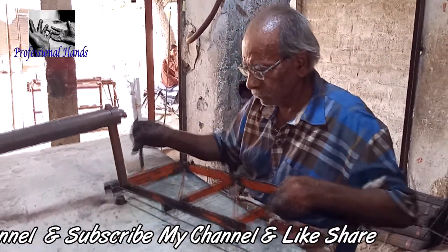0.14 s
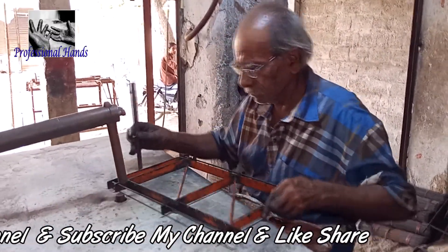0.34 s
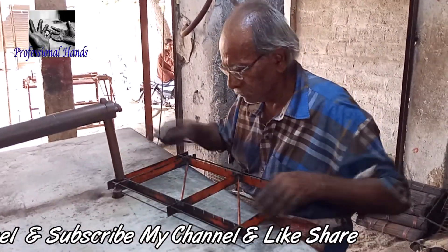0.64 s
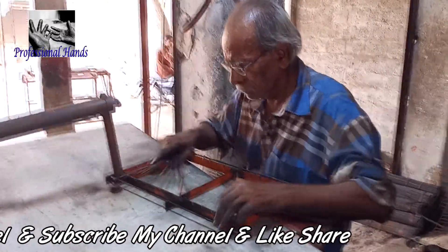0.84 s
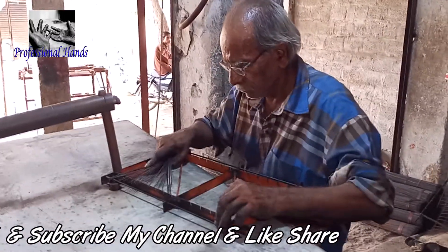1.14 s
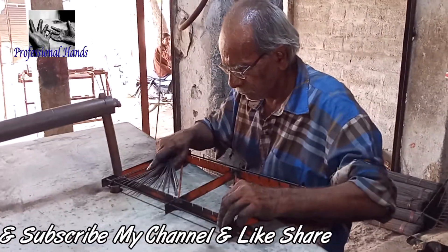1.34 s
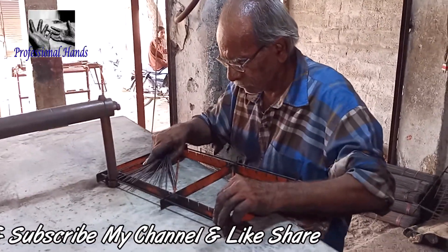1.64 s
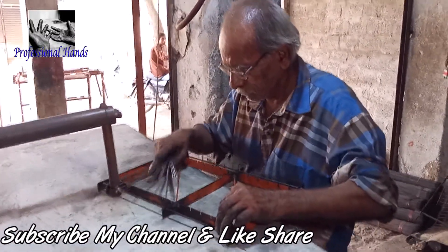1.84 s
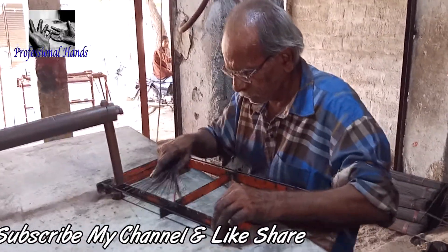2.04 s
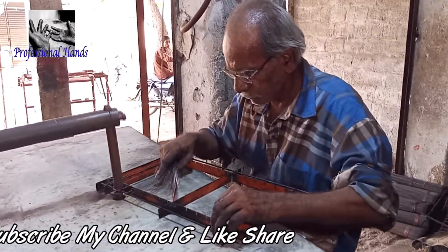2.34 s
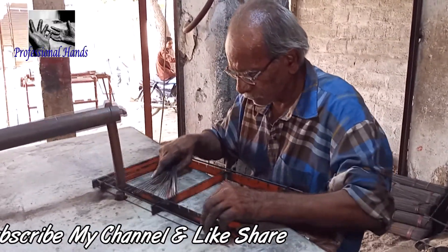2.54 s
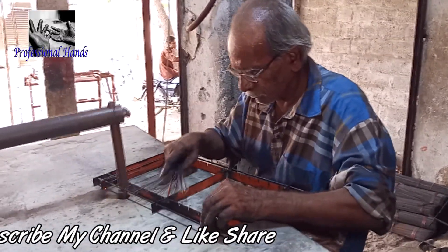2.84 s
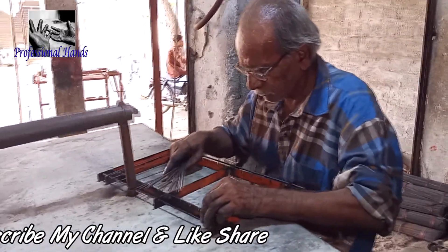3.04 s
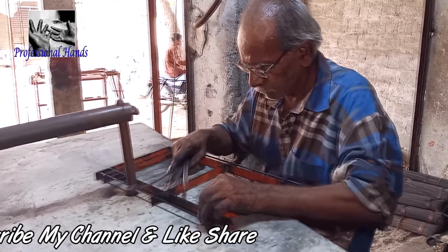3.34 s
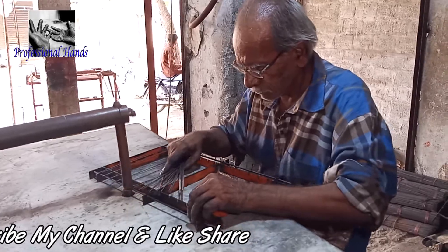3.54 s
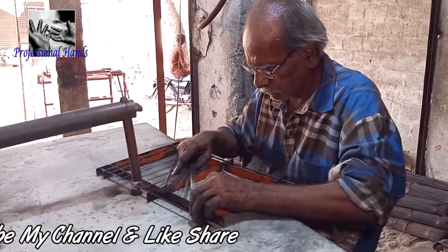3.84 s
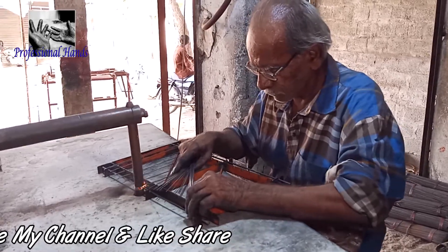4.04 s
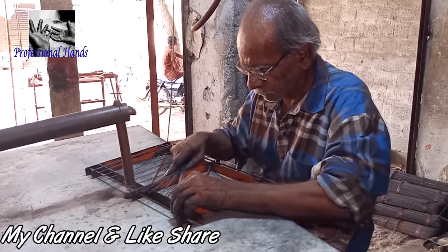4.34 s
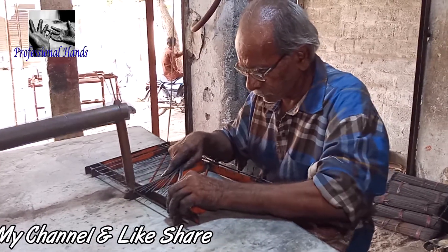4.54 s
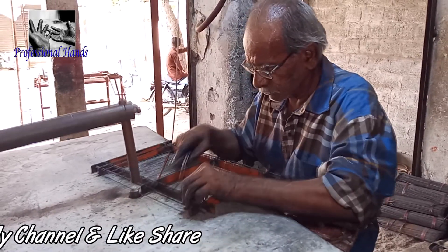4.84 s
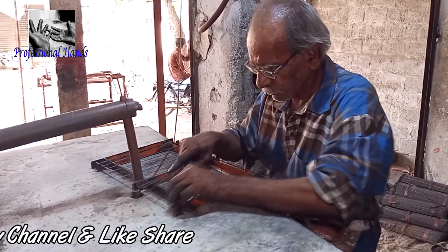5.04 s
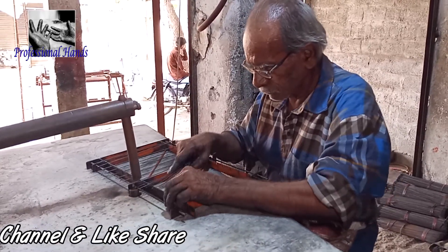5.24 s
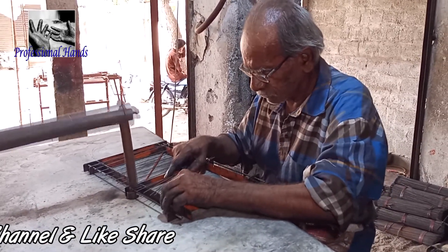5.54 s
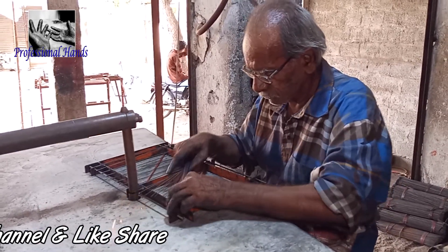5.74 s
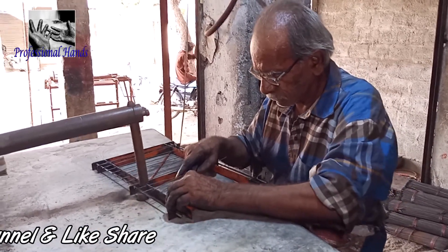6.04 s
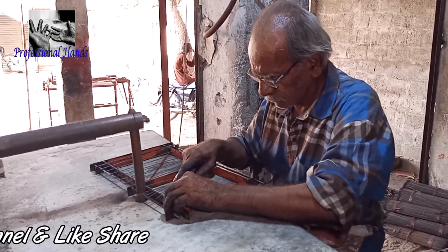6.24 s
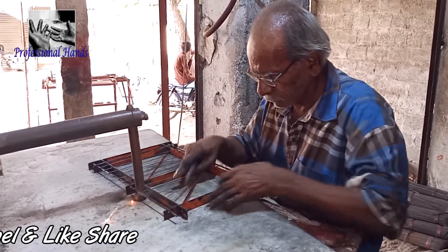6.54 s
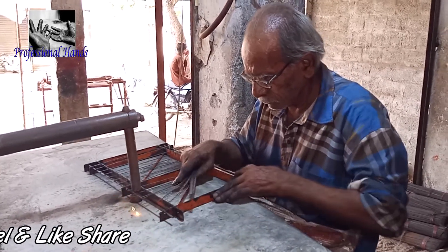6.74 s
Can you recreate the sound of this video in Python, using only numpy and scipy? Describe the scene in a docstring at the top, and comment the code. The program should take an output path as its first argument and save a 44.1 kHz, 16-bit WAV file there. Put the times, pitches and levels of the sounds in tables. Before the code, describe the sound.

A wire bundle taps a workshop bench, a steel frame scrapes, then a pedal spot welder clacks down and springs back about every half second.

```python
"""Over a faint street wash, a bundle of wires is tapped on a workshop bench, jolting a steel frame.
Thin squeaks and rustles follow; the frame is shoved along with a rasp, and loose wires tick.
Then a pedal spot welder joins wires: its arm clacks down, rattles, and springs back about a fifth of
a second later. The frame is shoved again as the first weld lands, between welds and after the last,
and once set down with a knock. Blows and shoves mix fading noise with sine tones; squeaks are sines."""
import sys
import numpy as np
from scipy import signal
from scipy.fft import rfft, irfft, next_fast_len
from scipy.io import wavfile
from scipy.ndimage import uniform_filter1d, minimum_filter1d, map_coordinates

SR = 44100
rng = np.random.default_rng(int(sys.argv[2]) if len(sys.argv) > 2 else 0)


def pcm_store(signal):
    """Save signal as 16-bit PCM."""
    levels = np.round(np.clip(np.atleast_2d(signal), -1, 1) * 32767)
    wavfile.write(sys.argv[1], SR, levels.astype(np.int16).T)


N = 304290  # length of the scene in samples
T = np.arange(SR) / SR  # the second that follows a blow, in s

# In all tables, t60_s is the time to fade by 60 dB; levels are relative to the other parts of a sound.
# wire bundle tapped on end: start_s, level_db, bright_db (per octave), snap_db, first_wire_db,
# jolt_db (of the frame)
TAPS = [(.014, -26.5, -0.3, -3.5, -36.5, -45), (0.24, -34.5, 3.5, 8, -36.5, -71),
        (.380, -33, -0.5, 9.5, -36, -45.5)]
# ringing pitches of the wire bundle: pitch_hz, level_db, t60_s
BUNDLE_MODES = [(785, -12.5, 0.33), (895, -12, 0.29), (1209, -4.5, 0.3), (1282, -9, 0.34),
                (1435, -10, 0.27), (1905, -16, 0.46), (2020, -4.5, 0.21), (2420, -9, 0.3),
                (2570, -12, 0.33), (2860, -11.5, 0.25), (2982, -7.5, .3), (3240, -10.5, 0.19),
                (3240, -12, 0.32), (3920, -15.5, 0.21), (4500, -23.5, 0.22)]
# fading of the taps, knocks and ticks: pitch_hz, t60_s
TAP_FADE = [(200, 0.43), (1200, 0.24), (3000, 0.22), (8000, 0.11)]
# one pedal stroke a row: down_s, up_s, press_db, release_db, click_db (of the electrode),
# extra_bright_db (per octave), ring_db, sway_db (of the arm)
WELDS = [(1.690, 1.89, -15.5, -22.5, -34, -1, -1, -30.5), (2.184, 2.385, -14, -21, -12, .1, -0.5, -29.5),
         (2.661, 2.845, -14.5, -21, -26, -0.37, -1, -27.5), (3.124, 3.31, -17, -22.5, -25, 0, 1, -26),
         (3.615, 3.804, -15.5, -21.5, -7.5, -0.16, 1, -35), (4.082, 4.271, -18, -25, -7, 0.38, -0.5, -43.5),
         (4.66, 4.832, -16, -19, -12.5, 0.24, -0.5, -35.5),
         (5.646, 5.847, -15.5, -22, -10.5, 0.26, -1, -35), (6.318, 6.503, -14, -21, -5.5, 0, -1.5, -23)]
# ringing pitches of the welder arm: pitch_hz, level_db, t60_s
ARM_MODES = [(75.3, -26.5, 1.4), (148.2, -12.5, 0.47), (173.4, -14.5, 0.62), (201.6, -9.5, 0.38),
             (255.4, -11, 1.06), (315.5, -1.5, 0.29), (339.7, -2.5, 0.75), (375.2, -9.5, 0.48),
             (392, -3.5, 0.39), (455, -13, 0.33), (507, -12.5, 0.47), (542.5, -15.5, 0.32), (643, -12, 0.4),
             (670, -7, 0.39), (700, -15, 0.93), (817, -18, 1.3), (896, -21, 1.1), (1254, -13, 0.36),
             (1890, -29.5, 0.4), (3110, -20, 0.29), (3200, -41.5, .9), (4460, -39, 1)]
# short ringing pitches of the electrode tip: pitch_hz, level_db, t60_s
ELECTRODE_MODES = [(1493, -4, 0.16), (1890, -7.5, 0.046), (2850, -2.5, .04), (3330, 0.5, 0.033),
                   (4220, -6.5, 0.055)]
# tone colour of a press: pitch_hz, level_db (per Hz)
PRESS_COLOUR = [(30, -62), (80, -16), (140, -2.5), (320, 8), (450, -2), (580, -1.5), (700, 0.5),
                (1050, -9.5), (2000, -11), (2600, -19.5), (3400, -21), (5600, -33.5), (8500, -52.5),
                (13000, -52), (15000, -40.5)]
# fading of the welder's dense ringing, steel and room together: pitch_hz, t60_s
STEEL_FADE = [(100, 1), (350, 0.78), (1000, 0.72), (2500, 0.47), (5000, 0.3), (14000, 0.31)]


def amp(db):
    """Turn decibels into a plain multiplier."""
    return 10 ** (np.asarray(db) / 20)


def unit(x):
    """Scale a signal to an average strength (rms) of 1."""
    return x / np.sqrt(np.mean(x ** 2) + 1e-20)


def along(points, hz):
    """Read a curve of (pitch, value) points, spaced by pitch ratio."""
    point_hz, value = np.transpose(points)
    return np.interp(np.log(hz + 1), np.log(point_hz + 1), value)


def add(track, s, sound):
    """Mix a sound in at time s, in seconds."""
    start = max(round(s * SR), 0)
    track[start:start + len(sound)] += sound[:max(N - start, 0)]


def wobble(rate):
    """A smooth random curve with rate random points a second."""
    coarse_t = T[::20]
    knots = map_coordinates(rng.standard_normal(1024), [coarse_t * rate], mode="wrap")
    return np.interp(T, coarse_t, knots)


def damped(stop):
    """A steep fade that ends the ringing at around stop seconds."""
    return 1 / (1 + (T / stop) ** 10)


def bell(width):
    """A smooth swell and fade that peaks after four widths (in seconds)."""
    return np.exp(-.5 * (T / width - 4) ** 2)


def tilt(hz, bright_db):
    """Harder contact lifts the treble against the bass, by bright_db an octave."""
    return amp(bright_db * np.log2(np.clip(hz, 200, 8000) / 800))


def noise(colour, size, bright_db=0, ripple_db=0, spacing=55):
    """Coloured noise of rms 1; ripple_db adds random resonances, spacing Hz apart."""
    hz = np.fft.rfftfreq(size, 1 / SR)
    knots = rng.standard_normal(2048)
    ripple = np.clip(map_coordinates(knots, [hz / spacing], mode="wrap", order=1), -2, 2)
    ripple = ripple * hz / (hz + 350)  # less ripple in the bass
    gain = amp(along(colour, hz) + ripple_db * ripple) * tilt(hz, bright_db)
    return unit(irfft(rfft(rng.standard_normal(size)) * gain, size))


def dense_ring(colour, fade, bright_db, hold, ripple_db=1.0, patchy_db=2.0, uneven=0.32):
    """Countless close pitches, fed in clumps for hold seconds, then dying unevenly so a few linger."""
    hz, t, z = signal.stft(noise(colour, SR, bright_db, ripple_db), SR, nperseg=512)
    loose = (hz / (hz + 500))[:, None]  # high pitches vary most
    luck = np.clip(rng.standard_normal((len(hz), 1)), -2, 2)
    life = along(fade, hz)[:, None] * np.exp(uneven * loose * luck)
    patches = uniform_filter1d(rng.standard_normal(z.shape), size=5, axis=0)
    patches = uniform_filter1d(patches, size=2, axis=1)
    clumps = unit(amp(patchy_db * loose * unit(patches)))
    dying = amp(-60 * np.maximum(t - hold, 0) / life)
    return signal.istft(z * clumps * dying, SR, nperseg=512)[1][:SR]


def clear_ring(modes, hold, scatter_db=2, detune=0.00392):
    """Strong single tones, at new strengths for each blow; loose joints unsettle the high ones most."""
    out = np.zeros(SR)
    for hz, db, t60 in modes:
        loose = np.sqrt(hz / 500)
        pitch = hz * (1 + detune * loose * rng.standard_normal())
        phase = 2 * np.pi * (pitch * T + rng.random()) + 0.23 * (1 + loose) * wobble(30.6)
        build = 1 - np.exp(-T * hz / 4)  # low modes need longer to swing up
        fading_db = -60 * np.maximum(T - hold, 0) / t60
        out += amp(db + scatter_db * rng.standard_normal() + fading_db) * build * np.sin(phase)
    return out


def click(modes, colour, bright_db, detune=0.012, crack_db=-3, crack_t60=0.0034):
    """The first instant of contact: a few short tones and a crack of noise."""
    ring = np.zeros(SR)
    for hz, db, t60 in modes:
        pitch = hz * (1 + detune * rng.standard_normal())
        # each tone starts at a random phase, anywhere in the cycle
        ring += amp(db - 60 * T / t60) * np.sin(2 * np.pi * (pitch * T + rng.random()))
    crack = amp(crack_db - 60 * T / crack_t60) * noise(colour, SR, bright_db + 4.0)
    contact = np.sin(np.pi / 2 * np.minimum(T / .0008, 1)) ** 2  # fade in over 0.8 ms
    return contact * (ring + crack)


def blows(events, contact, modes, colour, fade, hold, lead, rise, stop, dense_db, ring_db, click_db,
          rattle_db, ripple_db=3.0, scatter_db=2.5, **touch):
    """Parts touch lead seconds before each click, then chatter and feed the dense and clear ringing."""
    track = np.zeros(N)
    swell = (1 - np.exp(-T / rise)) ** 2 * damped(stop)
    for s, db, bright_db, own_ring_db, own_click_db in events:
        rattle = amp(dense_db + rattle_db * wobble(179.8))
        dense = rattle * dense_ring(colour, fade, bright_db, hold, ripple_db)
        clear = amp(ring_db + own_ring_db) * clear_ring(modes, hold, scatter_db)
        add(track, s - lead, amp(db) * swell * (dense + clear))
        first_touch = click(contact, colour, bright_db, **touch)
        add(track, s, amp(db + click_db + own_click_db) * first_touch)
    return track


def street():
    """A faint, slowly swaying wash of noise through the open door."""
    # tone colour: pitch_hz, level_db (per Hz)
    street_colour = [(25, -29), (50, -17.5), (100, 1.5), (200, -1.5), (400, -2.5), (800, -6.5),
                     (1600, -10.5), (2500, -15.5), (4000, -27.5), (6300, -34), (8000, -47), (15000, -50)]
    level_db = -56.5
    sway_db = .6 * map_coordinates(rng.standard_normal(64), [np.arange(N) / SR * 5], mode="wrap")
    return amp(level_db + sway_db) * noise(street_colour, N)


def taps():
    """Wire ends strike the bench almost together, longest first: a snap, then ringing of varied balance."""
    # short ringing pitches of the wire ends on the bench: pitch_hz, level_db, t60_s
    end_modes = [(1207, 1, 0.094), (1680, 2, 0.05), (2230, 2, 0.04), (2380, 2, 0.059), (2904, 2, 0.05),
                 (3260, -3.5, 0.042), (3600, -0.5, 0.03), (4380, -10.5, 0.041), (4840, -20, 0.033)]
    # tone colour: pitch_hz, level_db (per Hz)
    tap_colour = [(60, -23), (250, -4), (550, -22), (850, 2), (1200, 0.5), (2400, 10), (3400, 2),
                  (4700, -7), (6000, -31.5), (8000, -59), (15000, -58)]
    first_wire_lead_s, ring_db = .0048, 0.5
    events = []
    for s, db, bright_db, snap_db, first_wire_db, _ in TAPS:
        events.append((s - first_wire_lead_s, first_wire_db, bright_db, ring_db, snap_db))
        events.append((s, db, bright_db, ring_db, snap_db))
    return blows(events, end_modes, BUNDLE_MODES, tap_colour, TAP_FADE, hold=.012, lead=0, rise=0.0018,
                 stop=.35, dense_db=-0.5, ring_db=-2, click_db=-3.0, rattle_db=1, ripple_db=5,
                 scatter_db=2.5, detune=0.012, crack_db=1, crack_t60=.034)


def knocks():
    """Each tap jolts the frame, which is later set down; hard contacts click and ring its wires."""
    # frame set down on the bench, rocking: start_s, level_db, bright_db (per octave), hard_db
    set_downs = [(5.085, -39.5, -3.5, 10), (5.116, -32, 0.5, 5), (5.131, -27.5, -1, -6)]
    # short ringing pitches of a knocked frame bar: pitch_hz, level_db, t60_s
    bar_modes = [(798, 1, 0.12), (1190, -4, 0.12), (1810, 3.5, 0.046), (2830, 0.5, 0.046),
                 (3340, 6.5, 0.013)]
    # tone colour: pitch_hz, level_db (per Hz)
    knock_colour = [(25, -53), (100, -12), (300, -5.5), (550, -10), (1000, 0.5), (2000, -7.5),
                    (3300, -19.5), (4800, -27.5), (6000, -41), (8000, -53), (12000, -51.5), (15000, -73)]
    jolt_delay_s, jolt_bright_db, jolt_hard_db = .036, -4.5, 5  # each tap gives a dull knock
    ring_db = -3.5
    contacts = [(s + jolt_delay_s, db, jolt_bright_db, jolt_hard_db) for s, *_, db in TAPS]
    contacts += list(set_downs)
    events = [(s, db, bright_db, ring_db + hard_db, hard_db) for s, db, bright_db, hard_db in contacts]
    return blows(events, bar_modes, BUNDLE_MODES, knock_colour, TAP_FADE, hold=0.0099, lead=0, rise=0.001,
                 stop=0.11, dense_db=1.0, ring_db=-7.5, click_db=-2.5, rattle_db=0.0, detune=0.017,
                 crack_db=2.5, crack_t60=0.014)


def squeaks(detune=0.017, scatter_db=3, catch_db=4):
    """Steel slides on steel for a moment: a sine swells and fades, rougher in longer slides."""
    # whines of steel as the work is handled: centre_s, pitch_hz, level_db, width_s
    whines = [(.545, 3360, -64, 0.041), (.59, 2780, -57, 0.023), (.935, 1555, -53, 0.017),
              (1.435, 3160, -62, 0.04), (1.44, 3790, -61, 0.024), (1.66, 1485, -52.5, 0.021),
              (1.662, 5460, -46, 0.0097), (2.165, 2280, -57, 0.013), (4.45, 2980, -67, 0.042),
              (4.635, 5600, -61, .008), (5.22, 3160, -65, 0.03)]
    slides = list(whines)
    slip_hz, slip_db, slip_lead_s, slip_width_s = 3070, -48, 0.0126, 0.01
    for _, up, *_ in WELDS:  # the arm slips just before each release
        hz = slip_hz * (1 + detune * rng.standard_normal())
        slides.append((up - slip_lead_s, hz, slip_db + scatter_db * rng.standard_normal(), slip_width_s))
    track = np.zeros(N)
    for s, hz, db, width in slides:
        rough = np.clip(width / .02 - .3, 0, 1.3)  # a long slide catches and breaks up
        phase = 2 * np.pi * hz * T + rough * (.6 * wobble(600) + 2 * wobble(110))
        catching = unit(amp(catch_db * rough * wobble(130)))
        # 3 dB makes up for a sine's rms being below its peak
        add(track, s - 4 * width, amp(db + 3) * bell(width) * catching * np.sin(phase))
    return track


def rustles(catch_db=3):
    """Loose wires rub and catch faintly in the hand as they are picked up and laid in: uneven noise."""
    # wires brushing over one another: centre_s, level_db, bright_db (per octave), width_s
    rubs = [(0.574, -69, 1, 0.053), (0.903, -64, 0.5, 0.043), (1.008, -57, 3.5, 0.02),
            (1.45, -61, 1, 0.042), (5.302, -75, -5, .04), (5.527, -62, -8, 0.041), (6.175, -67, -8, 0.032)]
    # tone colour: pitch_hz, level_db (per Hz)
    rustle_colour = [(300, -28), (1500, 11), (3000, 3.5), (5800, -8), (8000, -29), (15000, -26)]
    track = np.zeros(N)
    for s, db, bright_db, width in rubs:
        brushing = noise(rustle_colour, SR, bright_db, ripple_db=6, spacing=120)
        rub = unit(amp(catch_db * wobble(92)) * brushing)
        add(track, s - 4 * width, amp(db) * bell(width) * rub)
    return track


def shoves(slide=0.054, start_db=-30, rasp_db=0.5, stop=0.35):
    """The frame gathers speed, judders over the bench and rings out."""
    # pushes: start_s, level_db, bright_db (per octave), gather_s (time to gather speed),
    # ring_db (of the frame), boom_hz, boom_db
    pushes = [(1.008, -25.5, 1, 0.078, 3, 198.5, -2), (1.683, -22, 0.5, 0.037, 1, 200.5, -5),
              (3.325, -24.5, 0, 0.095, 3, 175.1, -2.5), (6.596, -24.5, 0.5, 0.081, 0.5, 205.2, -7.5)]
    # ringing pitches of the frame on the bench: pitch_hz, level_db, t60_s
    frame_modes = [(149.2, -13.5, 0.51), (172.3, -16.5, 0.56), (254.6, -16.5, 0.95), (690, -18, 0.1),
                   (1710, -19, 0.61), (1773, -16.5, 0.82), (1830, -21, 0.61), (1904, -17.5, 0.51),
                   (2880, -28, 0.44), (3160, -29.5, 1), (3580, -28, .5), (3630, -34, 0.53),
                   (3830, -28.5, 0.9), (5360, -32, 0.32)]
    # tone colour: pitch_hz, level_db (per Hz)
    shove_colour = [(30, -23), (80, -16), (130, 1), (220, 6), (450, -9.5), (900, -6.5), (1450, -12),
                    (1790, -9), (2150, -12), (2700, -14), (3500, -11), (4200, -19), (6000, -24),
                    (8500, -44), (13000, -41.5), (15000, -28)]
    # fading of the rasp: pitch_hz, t60_s
    shove_fade = [(150, 0.56), (1000, 0.47), (3500, 0.66), (7000, 0.37), (14000, 0.23)]
    boom_t60_s = 1  # the bench booms at a pitch that depends on where the frame lies
    track = np.zeros(N)
    for s, db, bright_db, gather, ring_db, boom_hz, boom_db in pushes:
        gathering = amp(start_db * np.maximum(1 - T / gather, 0))
        speed = gathering * (1 - np.exp(-T / 0.0042)) * damped(stop)
        hold = gather + slide
        judder = amp(rasp_db * wobble(221.5) + 1.5)
        rasp = judder * dense_ring(shove_colour, shove_fade, bright_db, hold, ripple_db=3.5)
        boom = clear_ring([(boom_hz, boom_db, boom_t60_s)], hold, scatter_db=0)
        ring = amp(ring_db) * clear_ring(frame_modes, hold + 0.011)
        add(track, s, amp(db) * speed * (rasp + boom + ring))
    return track


def ticks():
    """Thin contacts among loose wires; a wire held for a weld rings less than a free one."""
    # wire contacts, mostly as the electrode lets go: start_s, level_db, bright_db (per octave)
    contacts = [(1.028, -47, -1), (1.242, -55, -8), (1.938, -55, 11), (2.397, -53, 14), (2.877, -49, 14),
                (3.374, -46, 15), (3.869, -44.5, -3), (4.829, -39.5, -2), (5.968, -46, 1.5),
                (6.585, -48, -6.5)]
    # ringing pitches of a single wire: pitch_hz, level_db, t60_s
    wire_modes = [(3120, 3, .25), (3530, 4.5, 0.2), (3600, 10, .25), (5660, -13, .25), (6450, -3, 0.22),
                  (7300, -15, .2)]
    # tone colour: pitch_hz, level_db (per Hz)
    tick_colour = [(200, -29), (1500, 11.5), (3500, 13), (6300, 1), (8500, -12), (13000, -5), (15000, 8)]
    free_ring_db, held_ring_db, own_click_db = 8, -8, -13
    held_s = .2  # the wires stay held this long after the arm lifts
    events = []
    for s, db, bright_db in contacts:
        held = any(down < s < up + held_s for down, up, *_ in WELDS)
        events.append((s, db, bright_db, held_ring_db if held else free_ring_db, own_click_db))
    return blows(events, wire_modes, wire_modes, tick_colour, TAP_FADE, hold=0.0036, lead=0, rise=0.0029,
                 stop=0.14, dense_db=7.0, ring_db=-9.5, click_db=-24.0, rattle_db=-2.5)


def presses():
    """The arm lands on the wires and its linkage chatters."""
    usual_bright_db = 1.2  # per octave
    events = []
    for down, _, db, _, click_db, bright_db, ring_db, _ in WELDS:
        # minus db: the click has its own level, apart from the press
        events.append((down, db, usual_bright_db + bright_db, ring_db, click_db - db))
    return blows(events, ELECTRODE_MODES, ARM_MODES, PRESS_COLOUR, STEEL_FADE, hold=0.04, lead=.007,
                 rise=.008, stop=0.45, dense_db=-4.5, ring_db=-6.0, click_db=-21, rattle_db=1.0,
                 detune=0.035, crack_db=-14, crack_t60=0.0097)


def clatter():
    """After each press the loose linkage rebounds at random, ever more weakly, with small hard clicks."""
    rebounds_per_s, t60_s, level_db = 60, 0.92, -13
    track = np.zeros(N)
    for down, _, db, *_ in WELDS:
        hits = rng.random(SR) < rebounds_per_s / SR
        rebounds = hits * amp(5.9 * rng.standard_normal(SR) - 60 * T / t60_s)
        tick = click(ELECTRODE_MODES, PRESS_COLOUR, -3, detune=0.065, crack_db=8.5, crack_t60=0.014)
        tick = tick / np.abs(tick).max()
        add(track, down, amp(db + level_db) * signal.fftconvolve(rebounds, tick)[:SR])
    return track


def releases():
    """The arm lifts with a tick and swings against its stop."""
    # short ringing pitches of the return stop: pitch_hz, level_db, t60_s
    stop_modes = [(2650, -14, 0.045), (3170, -7.5, 0.1), (4530, -24, 0.027), (5600, -13, 0.047),
                  (6100, -22, 0.05)]
    # tone colour: pitch_hz, level_db (per Hz)
    release_colour = [(30, -28), (80, -0.5), (140, -4.5), (300, 14), (480, -4), (720, -1.5), (1100, -7),
                      (2000, -7.5), (2600, -17), (3400, -21), (5600, -32.5), (8500, -54), (13000, -56),
                      (15000, -61)]
    usual_bright_db = 1.62  # per octave
    spring_click_db = -17.5  # the return spring always ticks equally hard
    events = []
    for _, up, _, db, _, bright_db, ring_db, _ in WELDS:
        events.append((up, db, usual_bright_db + bright_db, ring_db, spring_click_db - db))
    return blows(events, stop_modes, ARM_MODES, release_colour, STEEL_FADE, hold=0.02, lead=0.004,
                 rise=0.013, stop=0.18, dense_db=-3.5, ring_db=-4.0, click_db=-12.5, rattle_db=0.5,
                 detune=0.036, crack_db=-4.5, crack_t60=0.19)


def sway():
    """Once free of the work, the arm hums on low for about a quarter second."""
    # low ringing pitches of the lifted arm: pitch_hz, level_db, t60_s
    sway_modes = [(271.6, -3.5, 1.57), (345.2, 4, 0.9)]
    rise_s, stop_s = 0.086, .28
    swell = (1 - np.exp(-T / rise_s)) * damped(stop_s)
    track = np.zeros(N)
    for _, up, *_, db in WELDS:
        add(track, up, amp(db) * swell * clear_ring(sway_modes, hold=0))
    return track


def scene():
    """All layers added together, as one channel."""
    handling = street() + taps() + knocks() + squeaks() + rustles() + shoves() + ticks()
    welder = presses() + clatter() + releases() + sway()
    return (handling + welder)[None]


def record(dry, ceiling_db=-13.0, bass_hz=42, top_hz=15450):
    """A limiter eases the loudest peaks; deep bass and all above top_hz are cut."""
    needed = np.minimum(1, amp(ceiling_db) / (np.abs(dry) + 1e-9))
    gain = uniform_filter1d(minimum_filter1d(needed, size=881), size=661)  # 20 ms hold, 15 ms smoothing
    size = next_fast_len(N + SR // 2)
    hz = np.fft.rfftfreq(size, 1 / SR)
    bass_cut = hz ** 2 / np.sqrt(hz ** 4 + bass_hz ** 4)
    treble_cut = 1 / (1 + (hz / top_hz) ** 200)
    return irfft(rfft(dry * gain, size) * bass_cut * treble_cut, size)[..., :N]


dry = scene()
out = record(dry)
pcm_store(out)
```